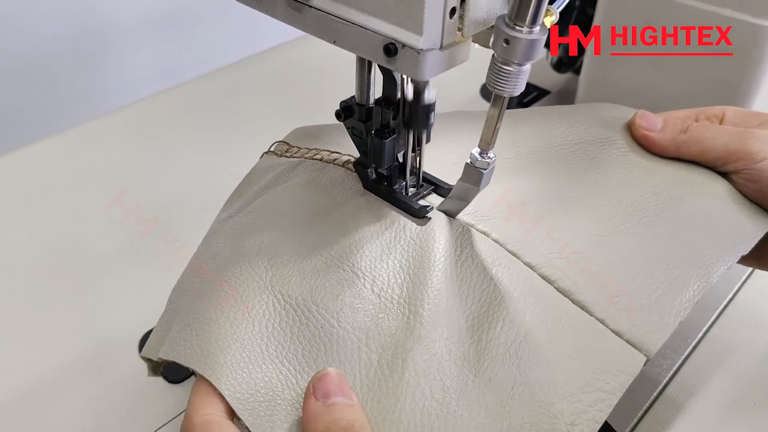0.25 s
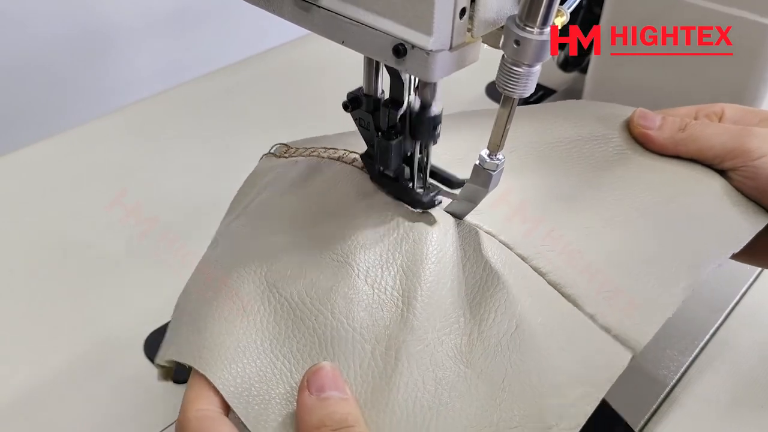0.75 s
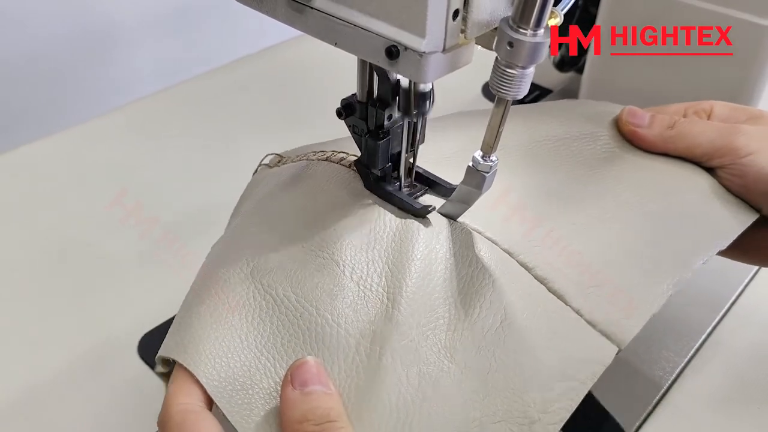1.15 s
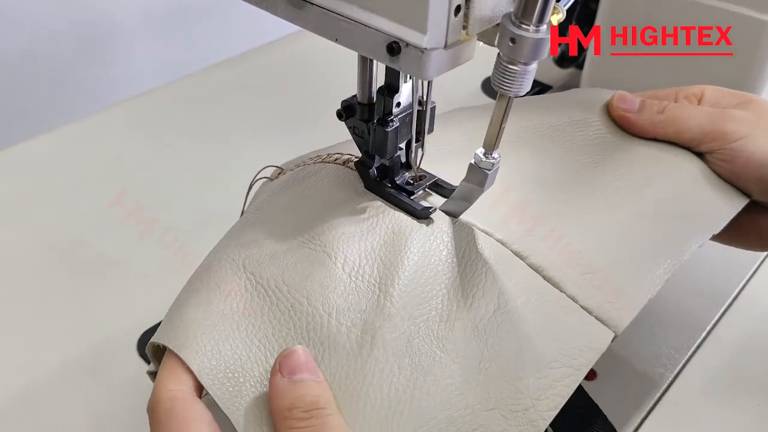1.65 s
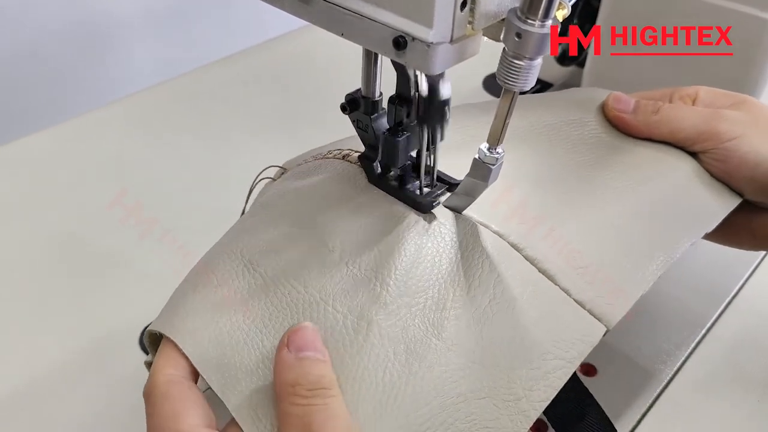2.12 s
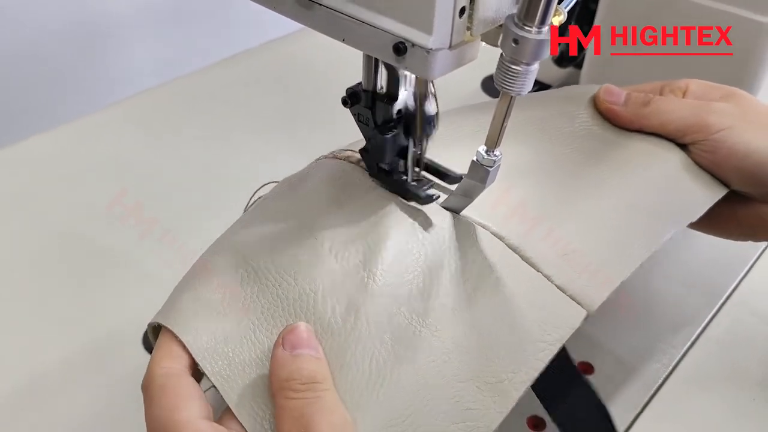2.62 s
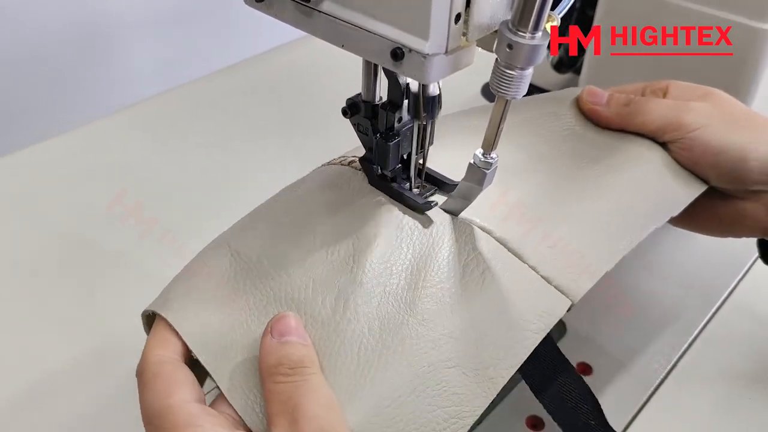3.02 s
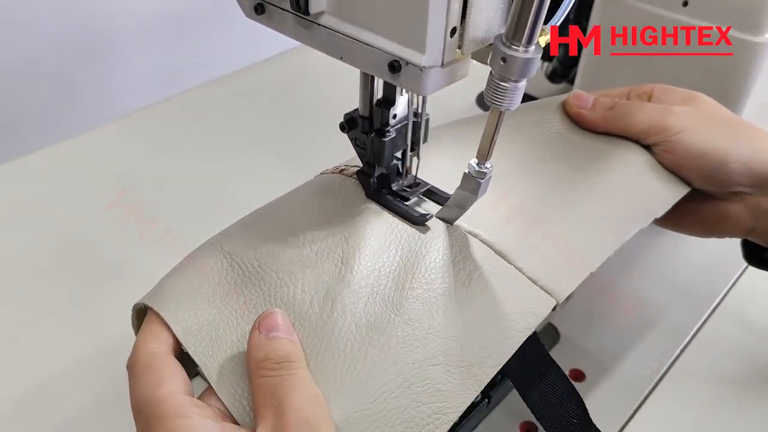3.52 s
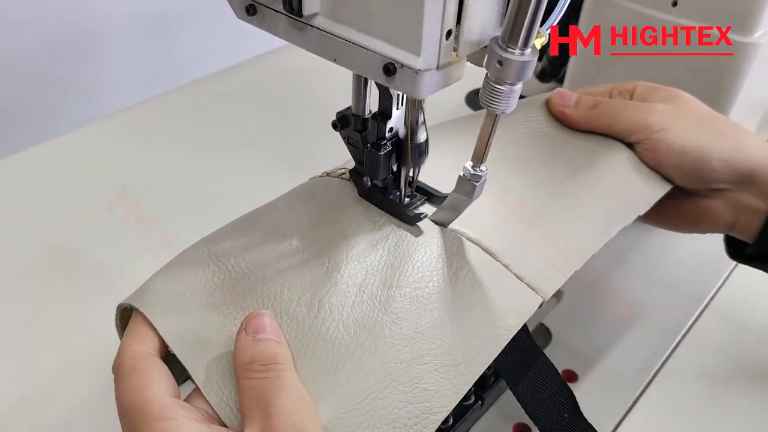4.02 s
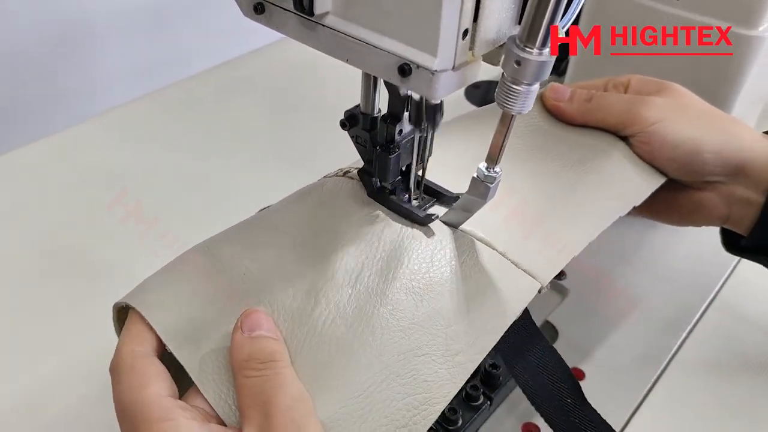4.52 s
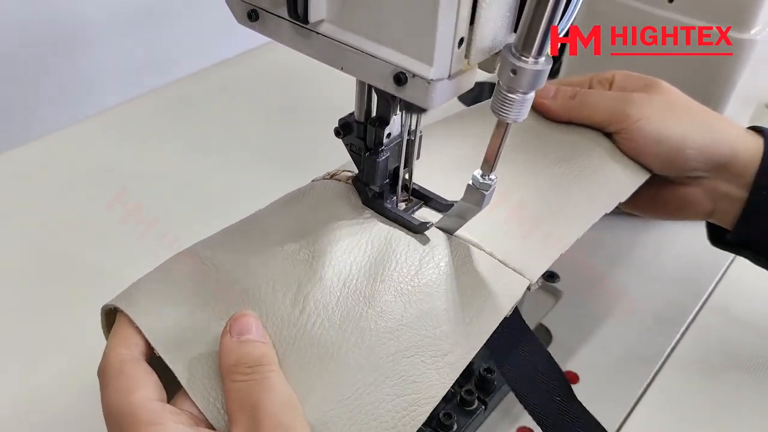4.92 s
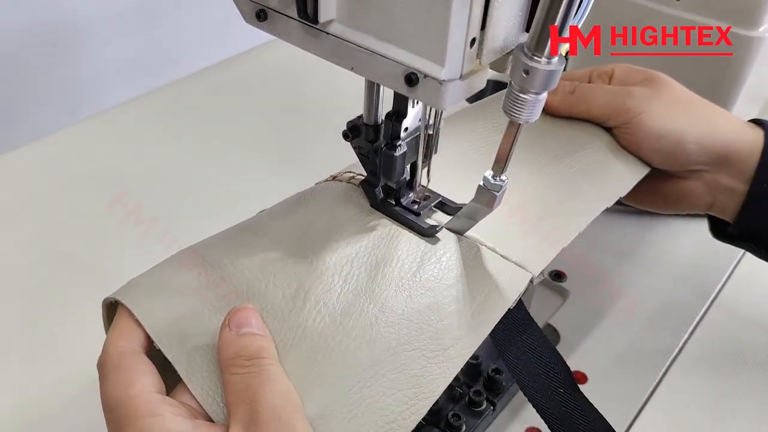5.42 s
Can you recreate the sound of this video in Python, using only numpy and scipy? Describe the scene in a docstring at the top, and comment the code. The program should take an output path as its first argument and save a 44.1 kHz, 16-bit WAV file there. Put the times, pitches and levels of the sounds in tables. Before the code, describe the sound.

Close up in a small workshop, a heavy sewing machine makes eight slow, evenly spaced stitches in leather. Every needle stroke gives a deep thud with a metallic edge, then the feed chatters, small steel parts tick and the foot clacks down more lightly. Occasional sharp thread clicks and tiny high pings fall between the knocks. Soft swells of low hum and a very faint hiss lie underneath throughout.

```python
"""A walking-foot sewing machine stitches leather slowly, one stitch every three quarters of a second.
In each stitch the needle stroke knocks, the feed chatters, hook and bobbin tick and the foot drops
with a clack: bursts of tiny impacts that ring the metal head. The table thumps, booms and rattles
under the knock. The drive hums in short swells and the thread rubs through its guides, over a faint
motor hiss and servo whine. A small workshop answers."""
import sys
import numpy as np
from scipy import signal
from scipy.fft import rfft, irfft
from scipy.io import wavfile

SR = 44100
rng = np.random.default_rng(int(sys.argv[2]) if len(sys.argv) > 2 else 0)


def persist_wave(psi):
    """Save psi, clipped to +-1, as 16-bit WAV."""
    counts = np.round(np.clip(psi, -1, 1) * 32767).astype(np.int16)
    wavfile.write(sys.argv[1], SR, np.atleast_2d(counts).T)


N = 249606
TIME = np.arange(N) / SR
STITCH_S = 0.7475  # one turn of the main shaft

# How hard each stitch works; needle, feed and foot are offsets from their usual stroke:
# knock_s, thump_db, boom_db, clunk_db, rattle_db, needle_db, feed_db, foot_db
STITCHES = [(0.01, -29.5, -45, -42.5, -59, 12, -4.5, 0.5), (0.7579, -26.5, -43, -41, -44, 2.5, -1.5, -10.5),
            (1.505, -27, -44.5, -50.5, -50.5, -1.5, -5.5, -2), (2.2523, -29, -51, -54, -57, -7.5, 0, -7),
            (3.0, -28.5, -41.5, -46, -46.5, -4.5, -5, 2), (3.7473, -30.5, -56.5, -66, -59, -16.5, -1, -8),
            (4.495, -28, -43.5, -66.5, -61, -14, -3, -1), (5.2425, -28, -49.5, -55, -52.5, -14, 2, -6)]
KNOCK_S, THUMP_DB, BOOM_DB, CLUNK_DB, RATTLE_DB, NEEDLE_DB, FEED_DB, FOOT_DB = np.transpose(STITCHES)
# how much of that offset reaches the head: casting_share, linkage_share, steel_share
NEEDLE_SHARES, FEED_SHARES, FOOT_SHARES = (0.96, 1.23, 0.32), (0.033, 1, 1.3), (1, 0.45, 0.39)

# metal contacts within a stitch: after_knock_s, spread_s, casting_db, linkage_db, steel_db
NEEDLE_ENTRY = [(-0.0395, 0.0017, -53, -56, -46.5)]
NEEDLE_STROKE = [(-0.017, 0.0022, -44.5, -43.5, -51.5)]
FEED_STROKE = [(0.0925, 0.0062, -50, -49.5, -45.5)]
FOOT_DROP = [(0.4592, 0.0027, -60, -62, -51), (0.466, 0.003, -43, -43.5, -41.5),
             (0.493, 0.0032, -49.5, -54, -65)]
BOBBIN_RATTLE = [(0.336, 0.0025, -63.5, -77, -64.5), (0.358, 0.0055, -82, -92, -68)]
BOBBIN_TICKS = [(0.3145, 0.00091, -67, -55.5, -48.5), (0.6855, 0.001, -60, -58.5, -52)]
# The hook turns twice a stitch, once with the thread and once idle:
# after_knock_s, spread_s, casting_db, linkage_db, steel_db, idle_offset_db
HOOK_TICKS = [(0.1868, 0.0029, -51.5, -47, -50.5, -3.5), (0.212, 0.0042, -59.5, -50, -52, -3),
              (0.258, 0.0028, -67.5, -55.5, -52.5, 3)]
# now and then the thread snaps off the hook with a sharper click: time_s, level_db
THREAD_SNAPS = [(0.638, -39.5), (1.693, -47), (2.136, -47.5), (3.961, -56), (4.309, -48.5), (4.686, -46.5),
                (5.128, -52.5), (5.429, -60), (5.455, -52.5)]
# That click; its negative spread makes it swell, then stop short:
# spread_s, casting_offset_db, linkage_offset_db, steel_offset_db
SNAP_SHAPE = (-0.0036, -8, -1.5, -1.5)
# the hook snaps past the thread and rings: start_s, level_db
HOOK_PINGS = [(1.07, -60), (2.066, -52), (2.436, -52), (3.931, -41), (4.308, -45.5), (4.681, -45.5)]

# The head's three ringing parts (casting, linkage, small steel parts):
# low_hz, high_hz, wet_db, build_s, t60_s, stereo_correlation
HEAD_PARTS = [(413, 3330, 7.5, 0.01, 0.17, -0.36), (3070, 10350, -1.96, 0.00049, 0.18, 0.29),
              (10160, 14300, -13.5, 0.001, 0.28, 0.19)]
# resonances of the head: pitch_hz, width_hz, lift_db
HEAD_RESONANCES = [(615, 12.5, 4.5), (748, 33, 5.5), (902, 22, 6.5), (1064, 143, 6.5), (1164, 95, 7),
                   (1720, 120, 3), (1975, 140, 8), (2152, 32, 2.5), (2312, 230, 7), (3560, 54, 6.5),
                   (3800, 930, 0.5), (5200, 1070, 5), (6650, 710, 9), (7790, 1020, 6), (12016, 800, 17)]
# tone colour of each kind of contact: frequency_hz, gain_db
FOOT_COLOUR = [(480, -13), (700, 1), (830, -3.5), (1050, 0.5), (1350, -6), (1700, -7), (2100, -4.5),
               (2900, -8), (4100, 4.5), (6500, -8), (9500, 0), (12000, 2), (15500, 13)]
FEED_COLOUR = [(480, -4), (900, -7), (1150, -4), (1400, -10.5), (1750, -3.5), (2800, -7), (4200, 4),
               (6500, -8.5), (9500, -2), (12000, -3), (15500, 8.5)]
NEEDLE_COLOUR = [(480, -1), (800, 8.5), (1150, -8), (1700, 10.5), (2100, 1.5), (2700, -5.5), (3400, -2.5),
                 (4200, -15), (7000, -24), (9500, -29), (12000, -16.5), (14000, 1), (15500, 5)]
TICK_COLOUR = [(480, 10.5), (900, 3), (1150, 0), (1500, 2.5), (2100, 0.5), (3200, -5), (5500, -2.5),
               (7200, -1), (9500, -1.5), (12000, 3), (15500, 20)]
# tone colour of what rings on after a blow: frequency_hz, gain_db
LEVER_COLOUR = [(750, -21), (950, -7.5), (1070, 4.5), (1190, -1), (1350, -14.5), (1750, -13), (1990, 2.5),
                (2200, -2), (2450, -11), (3000, -24.5)]  # the foot's lever
BOOM_COLOUR = [(55, -6.5), (100, -6.5), (143, 0), (162, -3.5), (187, 3.5), (200, -4), (213, 0),
               (232, -17.5), (290, -22.5)]  # the table top
CLUNK_COLOUR = [(200, -14.5), (251, 9), (268, 0), (283, 2), (320, -10), (340, -0.5), (390, -8), (440, -8.5),
                (520, -18), (700, -31)]  # the frame under it
RATTLE_COLOUR = [(360, -18), (428, 4.5), (447, -1.5), (468, 2.5), (540, -8), (610, 1.5), (670, -6),
                 (735, -0.5), (820, -21.5), (1200, -28.5)]  # its loose fittings
BED_COLOUR = [(700, -21), (950, -5), (1030, 4), (1150, 7), (1260, -12), (1700, -24)]  # the bed plate
TABLE_HZ = 91  # lowest resonance of the table

# the drive takes up load four times a stitch: after_knock_s, hum_db
DRIVE_LOADS = [(0.185, -50), (0.253, -61.5), (0.363, -60.5), (0.52, -52)]
# tone colour of the rubbing thread: frequency_hz, gain_db
THREAD_COLOUR = [(250, -4), (450, 5), (800, 0), (1150, 0), (1700, -1), (2300, -16), (3500, -48)]
# tone colour of motor hiss and room air: frequency_hz, gain_db
AIR_COLOUR = [(25, -8.5), (100, -2), (280, -7.5), (450, -12), (760, -9.5), (1150, -11), (1600, -22.5),
              (3000, -32), (5000, -26.5), (9000, -41), (12000, -29), (16000, -35)]
# level curve of the servo's whine: time_s, level_db
WHINE_LEVELS = [(0, -87.5), (2.4, -88.5), (2.9, -84.5), (4.15, -80), (4.4, -93), (5.66, -93)]
# stereo lean: frequency_hz, left_minus_right_db
STEREO_LEAN = [(100, -0.1), (400, -0.2), (1000, -0.3), (2200, -0.5), (4500, 2), (7000, 1.5), (11000, 3),
               (15000, 12)]


def machine_head():
    """Foot, feed, needle bar and hook all sound through the same metal head."""
    foot = each_stitch(FOOT_DROP, FOOT_DB, FOOT_SHARES)
    parts = contacts(foot, FOOT_COLOUR, grain_db=3.5, attack=3.3, width=0.65)
    feed = each_stitch(FEED_STROKE, FEED_DB, FEED_SHARES)
    parts += contacts(feed, FEED_COLOUR, grain_db=1.4, attack=1.9, width=1.0)
    needle = each_stitch(NEEDLE_STROKE, NEEDLE_DB, NEEDLE_SHARES)
    parts += contacts(needle, NEEDLE_COLOUR, grain_db=3.5, attack=6.3, width=0.74)
    parts += contacts(ticks(), TICK_COLOUR, grain_db=5.0, attack=1.46, width=1.0)
    return sum(shifting_tail(part, *tail) for part, (_, _, *tail) in zip(parts, HEAD_PARTS))


def each_stitch(pattern, force_db=0, shares=(1, 1, 1), every=1, scatter_s=0.0006, scatter_db=0.2):
    """The shaft repeats its contacts every stitch, or every few; no two strokes are quite alike."""
    stitches = np.column_stack([KNOCK_S, force_db + np.zeros(len(KNOCK_S))])[every - 1::every]
    hits = np.array([(knock_s + after_s, spread_s, *(levels + db * np.array(shares)))
                     for knock_s, db in stitches for after_s, spread_s, *levels in pattern])
    late, softer = rng.standard_normal((len(hits), 2)).T
    hits[:, 0] += scatter_s * late
    hits[:, 2:] -= scatter_db * softer[:, None]
    return hits


def ticks():
    """The light contacts: needle point, both turns of the hook, bobbin and thread snaps."""
    threaded = [row[:-1] for row in HOOK_TICKS]
    idle = [(after_s + STITCH_S / 2, spread_s, *(np.array(levels) + db))
            for after_s, spread_s, *levels, db in HOOK_TICKS]
    snaps = [(s, SNAP_SHAPE[0], *(np.array(SNAP_SHAPE[1:]) + db)) for s, db in THREAD_SNAPS]
    regular = each_stitch(NEEDLE_ENTRY + threaded + idle + BOBBIN_RATTLE)
    return np.vstack([regular, each_stitch(BOBBIN_TICKS, every=2), snaps])


def contacts(hits, colour, grain_db, attack, width, size=4096):
    """Each contact is a cluster of tiny impacts that rings the three parts of the head."""
    hz = np.fft.rfftfreq(size, 1 / SR)
    t = (np.arange(size) - size // 4) / SR
    resonances_db = sum(lift_db / (1 + (2 * (hz - pitch_hz) / width_hz) ** 2)
                        for pitch_hz, width_hz, lift_db in HEAD_RESONANCES)
    body_db = curve(colour, hz) + resonances_db
    noise = rng.standard_normal((len(hits), 4, size))
    impacts = noise[:, :1] + width * noise[:, 1:3]  # partly different paths to left and right
    grain = amp(grain_db * np.repeat(noise[:, 3:, ::16], 16, axis=2))
    age = t / np.array(hits)[:, 1:2]  # age and attack count in spreads
    envelope = np.exp(-np.where(age < 0, (age / attack) ** 2, age / 2))
    chatter = rfft(impacts * grain * envelope[:, None])
    weight = np.linalg.norm(envelope, axis=1)[:, None, None]
    out = np.zeros((len(HEAD_PARTS), 2, N))
    for part, (low_hz, high_hz, *_) in enumerate(HEAD_PARTS):
        band_db = -10 * np.log10((1 + (low_hz / (hz + 1)) ** 12) * (1 + (hz / high_hz) ** 20))
        rings = unit(irfft(chatter * body_response(body_db + band_db))) * weight
        for (hit_s, _, *levels), ring in zip(hits, rings):
            for channel, sound in zip(out[part], ring):
                add(channel, hit_s + t[0], amp(levels[part]) * sound)
    return out


def foot_lever(level_db=-52, after_s=0.456):
    """The foot's lever rings after each drop but the last, louder the harder the foot falls."""
    levels = level_db + 0.5 * FOOT_DB[:-1]
    ring = ring_on(LEVER_COLOUR, KNOCK_S[:-1] + after_s, levels, build_s=0.0083, t60=0.18, body_s=0.053)
    return shifting_tail(ring, wet_db=3.5, build_s=0.0027, t60=0.12, alike=-0.28)


def hook_pings(pitch_hz=6800, rise_s=0.0017, t60=0.0099):
    """The hook snaps past the thread with a short steel ping, each at a slightly different pitch."""
    out, t = np.zeros(N), TIME[:SR // 10]
    envelope = (1 - np.exp(-t / rise_s)) ** 2 * amp(-60 * t / t60)
    envelope /= envelope.max()
    for (start_s, db), detune in zip(HOOK_PINGS, rng.standard_normal(len(HOOK_PINGS))):
        tone = np.sin(2 * np.pi * pitch_hz * (1 + 0.047 * detune) * t)
        add(out, start_s, np.sqrt(2) * amp(db) * envelope * tone)
    return workshop(out, wet_db=-8.5, build_s=0.0022, t60=0.18, alike=0.1)


def table_thumps(glide_hz=10, glide_s=0.021, rise_s=0.015, fall_s=0.014, second_db=-24, third_db=-31):
    """The needle stroke rocks the table for a few cycles; the pitch lifts as the load lets go."""
    out, t = np.zeros(N), np.arange(-SR // 8, SR // 8) / SR
    phase = 2 * np.pi * np.cumsum(TABLE_HZ + glide_hz * np.tanh(t / glide_s)) / SR
    phase -= phase[len(t) // 2]  # the crest lands on the knock
    envelope = np.exp(-0.5 * (t / np.where(t < 0, rise_s, fall_s)) ** 2)
    overtones = amp(second_db) * np.cos(2 * phase) + amp(third_db) * np.cos(3 * phase)
    thump = np.sqrt(2) * envelope * (np.cos(phase) + envelope * overtones)
    for knock_s, db in zip(KNOCK_S, THUMP_DB):
        add(out, knock_s + t[0], amp(db) * thump)
    return workshop(out, wet_db=-19.0, build_s=0.012, t60=0.38, alike=1.0)


def table_shake(foot_clunk_db=-68.5, bed_db=-56):
    """The knock gives a centred boom and a wide clunk and rattle; foot and feed shake more lightly."""
    # these three start early and build into the knock
    boom = ring_on(BOOM_COLOUR, KNOCK_S - 0.033, BOOM_DB, build_s=0.02, t60=0.26, body_s=0.1)
    clunk = ring_on(CLUNK_COLOUR, KNOCK_S - 0.026, CLUNK_DB, build_s=0.016, t60=0.23, body_s=0.038)
    rattle = ring_on(RATTLE_COLOUR, KNOCK_S - 0.031, RATTLE_DB, build_s=0.0072, t60=0.21, body_s=0.039)
    drop_s = KNOCK_S + FOOT_DROP[1][0]
    foot = ring_on(CLUNK_COLOUR, drop_s, foot_clunk_db, build_s=0.013, t60=0.4, body_s=0.048)
    feed_s = KNOCK_S[::2] + 0.078  # every second feed stroke rings the bed plate
    bed = ring_on(BED_COLOUR, feed_s, bed_db, build_s=0.012, t60=0.18, body_s=0.032)
    centre = shifting_tail(boom, wet_db=-11.0, build_s=0.0044, t60=0.53, alike=0.99)
    wide = shifting_tail(clunk + rattle + foot + bed, wet_db=-2.5, build_s=0.0045, t60=0.33, alike=0.18)
    return centre + wide


def ring_on(colour, starts_s, levels_db, build_s, t60, body_s, size=16384):
    """A struck body rings as coloured noise, with the energy of its level held for body_s."""
    out, t, hz = np.zeros(N), TIME[:size], np.fft.rfftfreq(size, 1 / SR)
    skirts_db = 20 * np.log10(1 + (hz / colour[-1][0]) ** 3 + (colour[0][0] / (hz + 1)) ** 3)
    response = body_response(curve(colour, hz) - skirts_db)
    envelope = (1 - np.exp(-t / build_s)) ** 2 * amp(-60 * t / t60)
    for start_s, db in np.broadcast(starts_s, levels_db):
        burst = rng.standard_normal(size) * envelope
        ring = unit(irfft(rfft(burst) * response))
        add(out, start_s, amp(db) * np.sqrt(body_s * SR) * ring)
    return out


def drive_hum(swell_s=0.02, overtone_hz=152, overtone_db=-19, scatter_db=0.5):
    """Each push of the drive swells the table's low resonance, a little off pitch each time."""
    out, t = np.zeros(N), np.arange(-SR // 8, SR // 8) / SR
    envelope = np.exp(-0.5 * (t / swell_s) ** 2)
    swells = [(knock_s + after_s, db) for knock_s in KNOCK_S for after_s, db in DRIVE_LOADS]
    for peak_s, db in swells:
        hum_phase, overtone_phase, detune, softer = rng.random(4)
        hum = np.sin(2 * np.pi * (TABLE_HZ * (1 + 0.12 * (detune - 0.5)) * t + hum_phase))
        overtone = amp(overtone_db) * np.sin(2 * np.pi * (overtone_hz * t + overtone_phase))
        gain = np.sqrt(2) * amp(db - scatter_db * (2 * softer - 0.5))
        add(out, peak_s + t[0], gain * envelope * (hum + overtone))
    return workshop(out, wet_db=-39, build_s=0.012, t60=0.79, alike=0.75)


def thread_rub(level_db=-70.5, after_s=0.364, pull_s=0.027):
    """The take-up lever draws the thread tight once a stitch, rubbing it softly through its guides."""
    colour = amp(curve(THREAD_COLOUR, np.fft.rfftfreq(N, 1 / SR)))
    hiss = np.sqrt(N) * unit(irfft(rfft(rng.standard_normal(N)) * colour, N))
    pulls = sum(np.exp(-0.5 * ((TIME - knock_s - after_s) / pull_s) ** 2) for knock_s in KNOCK_S)
    return workshop(amp(level_db) * pulls * hiss, wet_db=2, build_s=0.0018, t60=0.083, alike=0)


def motor_and_air(air_db=-74.5, whine_hz=10000, waver_db=4.5):
    """Motor hiss and room air, centred in the bass, under the thin wavering whine of the servo."""
    hz = np.fft.rfftfreq(N, 1 / SR)
    left, other, flutter = rfft(rng.standard_normal((3, N)))
    alike = 1 / (1 + (hz / 600) ** 2)
    air = irfft(stereo_pair(left, other, alike) * amp(curve(AIR_COLOUR, hz)), N)
    waver = waver_db * np.sqrt(N) * unit(irfft(flutter * np.exp(-hz / 40), N))
    whine_db = np.interp(TIME, *np.transpose(WHINE_LEVELS)) + waver
    whine = np.sqrt(2) * amp(whine_db) * np.sin(2 * np.pi * whine_hz * TIME)
    return amp(air_db) * np.sqrt(N) * unit(air) + whine


def shifting_tail(sound, wet_db, build_s, t60, alike, tails=4):
    """The leather and the hands move on, so the stitches cycle through slightly different tails."""
    turn = np.floor(TIME / STITCH_S + 0.5) % tails
    return sum(workshop(sound * (turn == k), wet_db, build_s, t60, alike) for k in range(tails))


def workshop(sound, wet_db, build_s, t60, alike, right_delay_s=0.00017):
    """Direct sound arrives on the left first; dense ringing and reflections build and die behind it."""
    t = TIME[:SR // 2]
    envelope = (1 - np.exp(-t / build_s)) * amp(-60 * t / t60)
    left, other = unit(rng.standard_normal((2, len(t))) * envelope)
    response = amp(wet_db) * stereo_pair(left, other, alike)
    response[0, 0] += 1
    response[1, round(right_delay_s * SR)] += 1
    return signal.oaconvolve(np.atleast_2d(sound), unit(response), axes=1)[:, :N]


def stereo_pair(left, other, alike):
    """Two independent noises become left and right, with correlation alike."""
    return np.array([left, alike * left + np.sqrt(1 - alike ** 2) * other])


def body_response(gain_db):
    """The minimum-phase response of a passive body: it rings only after the blow."""
    cepstrum = irfft(np.log(amp(np.maximum(gain_db, gain_db.max() - 80))))
    half = len(cepstrum) // 2
    cepstrum[1:half] *= 2
    cepstrum[half + 1:] = 0
    return np.exp(rfft(cepstrum))


def curve(points, hz):
    """An EQ curve: straight lines on a log-frequency axis."""
    points_hz, gain_db = np.transpose(points)
    return np.interp(np.log(hz + 1), np.log(points_hz + 1), gain_db)


def amp(db):
    """Decibels to amplitude."""
    return 10 ** (np.asarray(db) / 20)


def unit(sound):
    """Scales each channel to unit energy."""
    return sound / np.sqrt(np.sum(sound ** 2, axis=-1, keepdims=True) + 1e-30)


def add(mix, start_s, sound):
    """Lays a sound into the mix, trimmed at both ends to fit."""
    start = round(start_s * SR)
    sound = sound[max(-start, 0):]
    part = mix[max(start, 0):][:len(sound)]
    part += sound[:len(part)]


def scene():
    """The machine's metalwork and its table in front; drive, thread and air behind."""
    metalwork = machine_head() + foot_lever() + hook_pings()
    return metalwork + table_thumps() + table_shake() + drive_hum() + thread_rub() + motor_and_air()


def record(dry, cutoff_hz=16000):
    """The treble leans to the left, and a steep low-pass trims the very top."""
    lean = amp(curve(STEREO_LEAN, np.fft.rfftfreq(N, 1 / SR)))
    pan = np.array([lean, np.ones_like(lean)]) * np.sqrt(2 / (1 + lean ** 2))
    panned = irfft(rfft(dry) * pan, N)
    lowpass = signal.firwin(255, cutoff_hz, window=("kaiser", 9), fs=SR)
    return signal.oaconvolve(panned, lowpass[None], "same", axes=1)


dry = scene()
out = record(dry)
persist_wave(out)
```